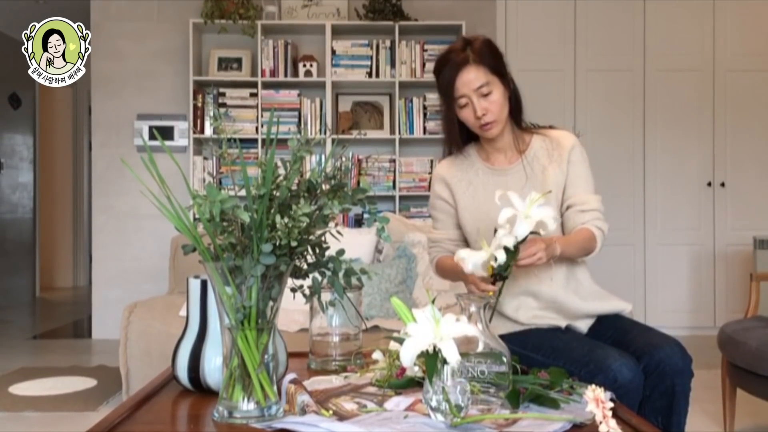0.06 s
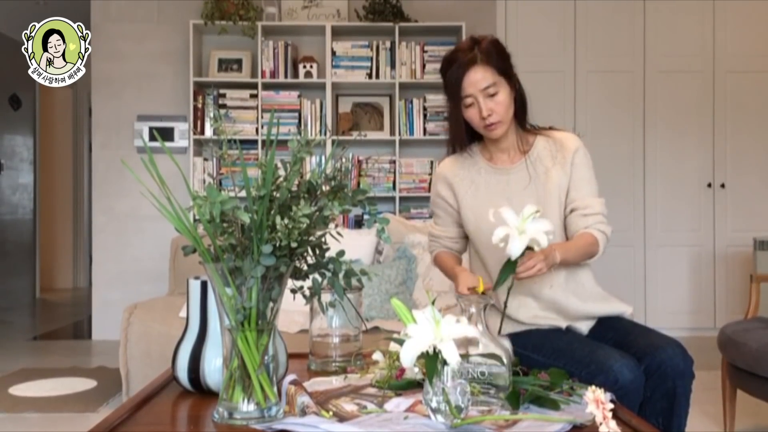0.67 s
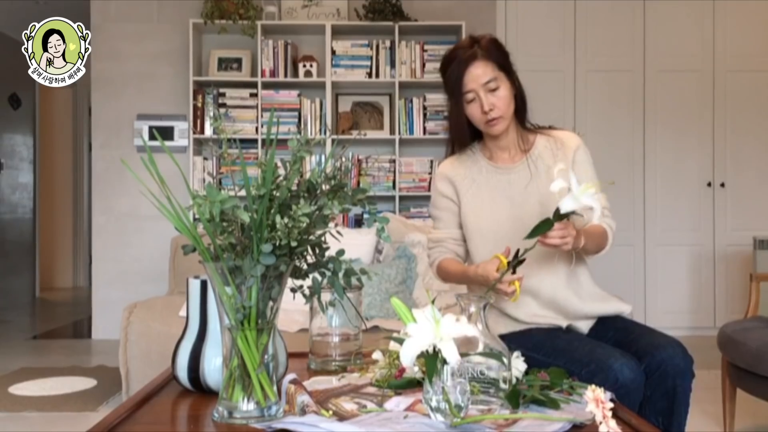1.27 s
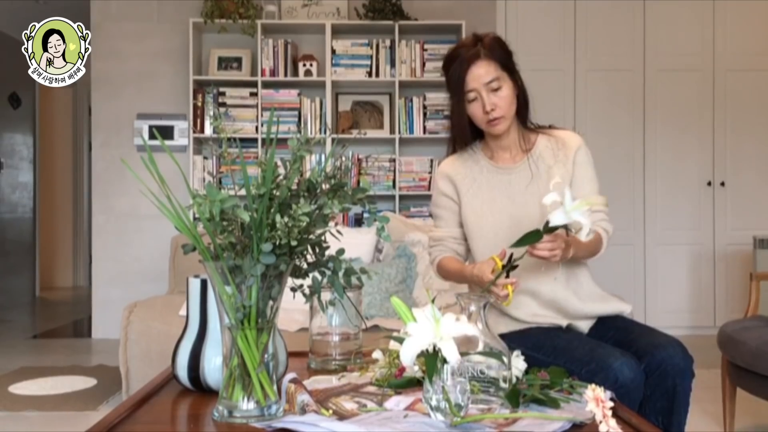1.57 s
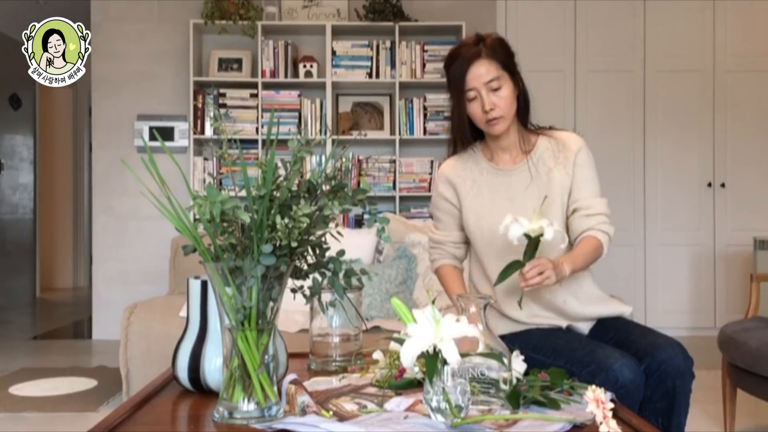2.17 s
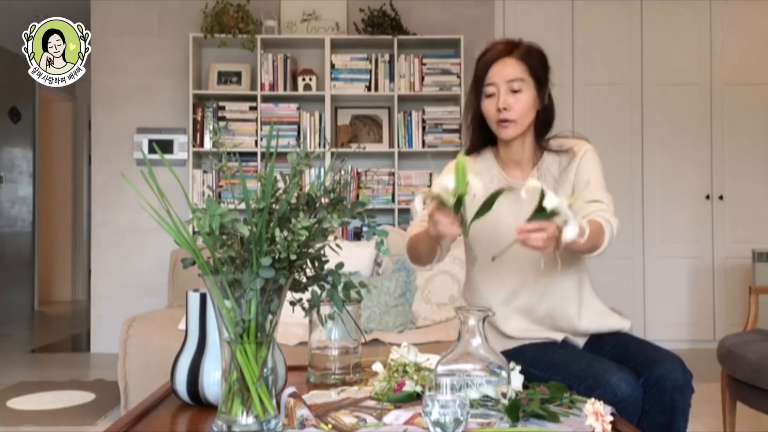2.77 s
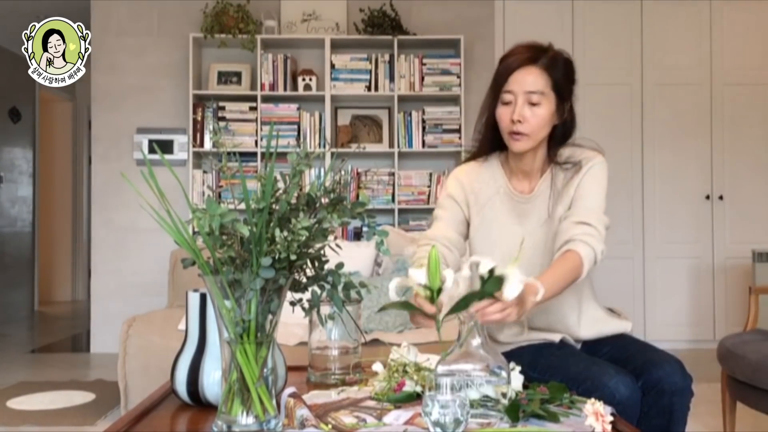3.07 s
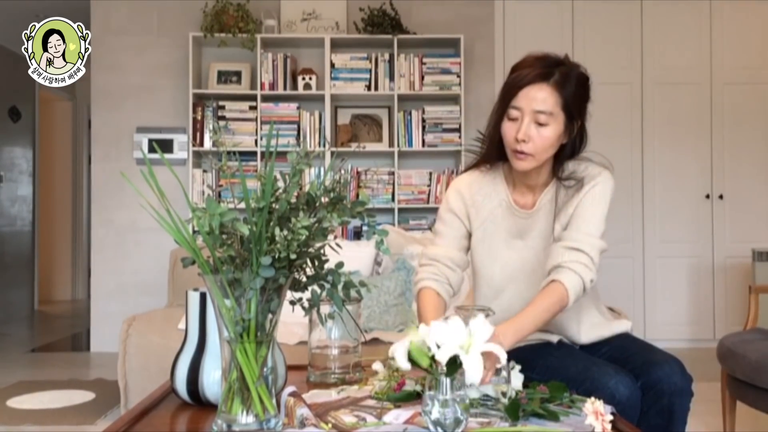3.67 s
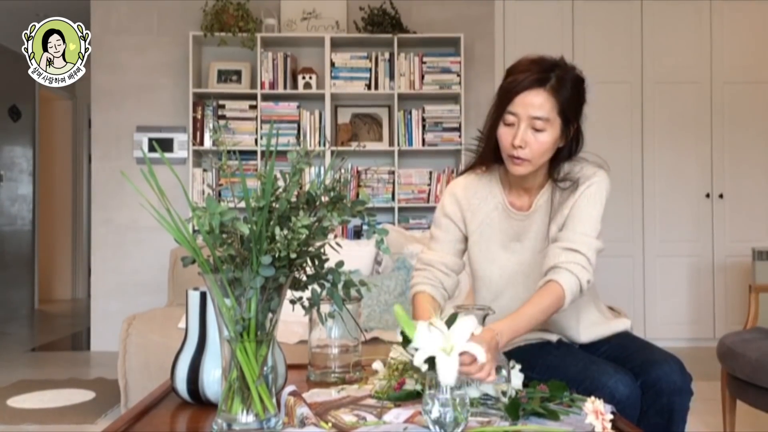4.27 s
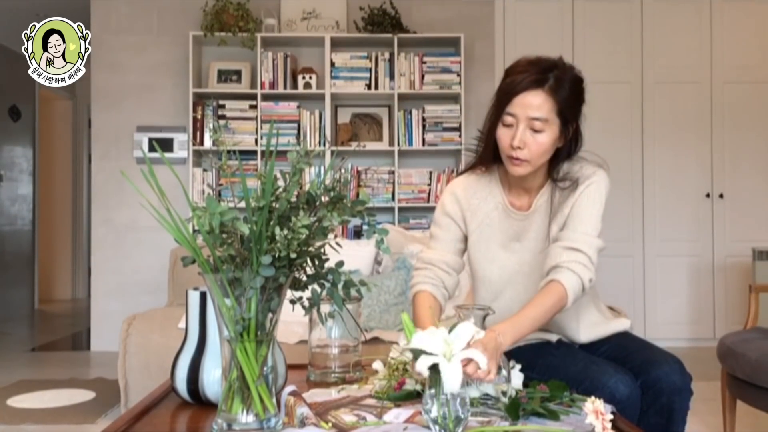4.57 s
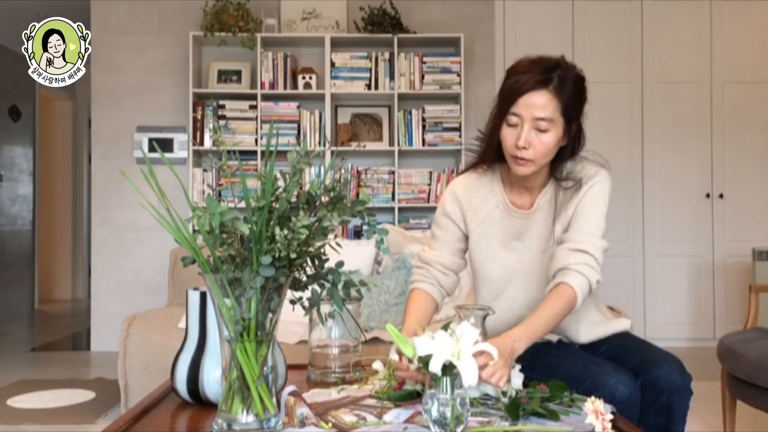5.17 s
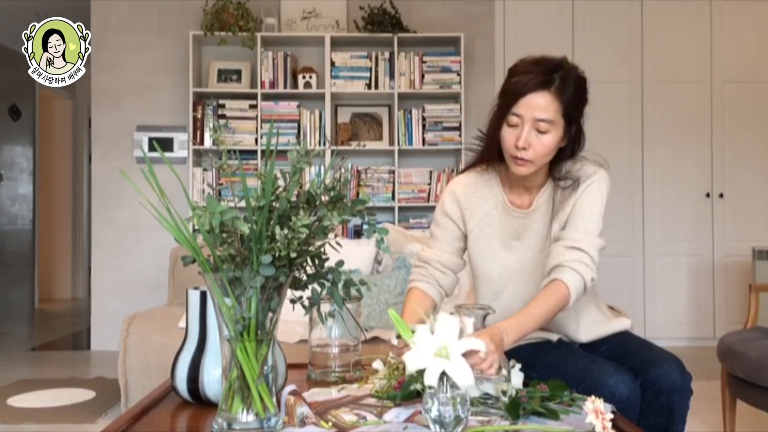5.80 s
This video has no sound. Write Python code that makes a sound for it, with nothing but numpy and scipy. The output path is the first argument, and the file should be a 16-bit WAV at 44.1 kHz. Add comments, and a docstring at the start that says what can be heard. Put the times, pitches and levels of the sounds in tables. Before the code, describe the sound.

In a quietly humming room, scissors snip twice and are set down, then stems rustle into a vase that knocks twice.

```python
"""Flower arranging in a quiet, slightly live living room, over a steady background hum.
Leaves flick and soft low thuds pass, like slow footsteps nearby. Scissors snap through a lily stem,
a small hollow pock follows and the offcut lands; they cut a second stem and are laid on the table.
Then leaves rustle, stems tick against a glass vase and slip on its neck, and the vase bumps twice
on the table top. One more thud sounds as the rustle fades."""
import sys
import numpy as np
from scipy import signal
from scipy.fft import rfft, irfft, next_fast_len
from scipy.io import wavfile
from scipy.ndimage import map_coordinates

SR = 44100
rng = np.random.default_rng(int(sys.argv[2]) if len(sys.argv) > 2 else 0)


def dump_mix(stems):
    """Bounce the given channels to the path in sys.argv[1] as a 16-bit WAV at rate SR."""
    frames = np.atleast_2d(stems).T  # one column per channel
    limited = np.clip(frames, -1, 1)  # hard clip at full scale
    pcm = np.round(limited * 32767).astype(np.int16)
    wavfile.write(sys.argv[1], SR, pcm)


N = 261981
T = np.arange(SR) / SR  # one second per event


def amp(db):
    """Decibels to gain."""
    return 10 ** (np.asarray(db) / 20)


def unit(x):
    """Scale to rms 1."""
    return x / np.sqrt(np.mean(x ** 2) + 1e-20)


def along(points, hz):
    """Read (Hz, value) points on a log frequency axis."""
    point_hz, values = np.transpose(points)
    return np.interp(np.log(hz + 1), np.log(point_hz), values)


def wobble(knots_per_s):
    """Smooth random curve."""
    knots = rng.standard_normal(int(N * knots_per_s / SR) + 4)
    return map_coordinates(knots, [np.arange(N) * knots_per_s / SR])


def noise(gain):
    """Steady noise of rms 1, shaped by gain(Hz)."""
    size = next_fast_len(N + SR // 4)
    spectrum = rfft(rng.standard_normal(size)) * gain(np.fft.rfftfreq(size, 1 / SR))
    return unit(irfft(spectrum, size)[:N])


def colour(x, shape_db, size=2048):
    """Minimum-phase filter of unit power, shaped by shape_db(Hz)."""
    gain = unit(amp(shape_db(np.fft.rfftfreq(size, 1 / SR))))
    cepstrum = irfft(np.log(gain + 1e-6))
    cepstrum[1:size // 2] *= 2
    cepstrum[size // 2 + 1:] = 0
    return signal.fftconvolve(x, irfft(np.exp(rfft(cepstrum))))[:len(x)]


def burst(length_s, passes=6):
    """Dense cluster of tiny cracks: quick rise, abrupt end, flat spectrum."""
    envelope = (1 - np.exp(-10 * T / length_s)) * np.exp(-(T / length_s) ** 4)
    cracks = rng.standard_normal(len(T))
    for _ in range(passes):
        phase = np.angle(rfft(cracks * envelope))
        cracks = irfft(np.exp(1j * phase))
    return cracks * (T < 2 * length_s) * np.linalg.norm(envelope)


def crackle(spectrum, length_s, tilt_db_per_oct):
    """A burst coloured by its material, tilted brighter or duller."""
    return colour(burst(length_s),
                  lambda hz: along(spectrum, hz) + tilt_db_per_oct * np.log2((hz + 500) / 5000))


def ring(modes, scatter_db=2):
    """Damped modes, struck at new strengths each time."""
    out = np.zeros(len(T))
    for hz, db, t60_s in modes:
        envelope = amp(db + scatter_db * rng.standard_normal() - 60 * T / t60_s)
        out += envelope * np.sin(2 * np.pi * (hz * T + rng.random()))
    return out


def in_room(x, wet_db):
    """Direct sound, wall echoes and a fresh diffuse tail whose treble dies first."""
    # Room decay. Each row: frequency in Hz, T60 in seconds.
    decay = [(60, 1), (250, 0.49), (1000, 0.6), (2800, 0.51), (4500, 0.48), (7500, 0.36), (11500, 0.3),
             (13500, 0.3), (16000, 0.24)]
    # Early echoes. Each row: delay in seconds, gain.
    walls = [(.0058, .26), (.0075, .14), (.0160, .28), (0.0199, .14)]
    hz, frame_s, frames = signal.stft(rng.standard_normal(len(T)), SR, nperseg=256)
    fade = amp(-60 * frame_s / along(decay, hz)[:, None])
    tail = signal.istft(frames * fade, SR, nperseg=256)[1][:len(T)]
    tail *= 1 - np.exp(-T / 0.00064)
    response = amp(wet_db) * tail / np.linalg.norm(tail)
    response[0] += 1
    for delay_s, gain in walls:
        response[round(delay_s * SR)] += gain
    return signal.fftconvolve(x, response)[:len(T)]


def add(track, start_s, x):
    """Mix x into the track."""
    start = max(round(start_s * SR), 0)
    track[start:start + len(x)] += x[:N - start]


def thuds(rows, wet_db):
    """Soft contacts: a few cycles swell and fade, then the room booms."""
    out = np.zeros(N)
    for peak_s, db, hz, half_length_s in rows:
        lead_s = np.pi * half_length_s
        envelope = np.exp(-((T - lead_s) / half_length_s) ** 2)
        push = envelope * np.cos(2 * np.pi * hz * (T - lead_s))
        add(out, peak_s - lead_s, amp(db) * in_room(push, wet_db))
    return out


def background(air_db=-41):
    """Steady air noise with narrow humming bands."""
    # Hum bands. Each row: centre in Hz, width in Hz, level in dB.
    bands = [(72.5, 17, -54), (114.5, 18, -50.5), (225.2, 14, -48), (265.7, 40.5, -47), (338.4, 34, -52),
             (556.2, 7.8, -58.5), (606.7, 18, -58.5)]
    # Air spectrum. Each row: frequency in Hz, relative density in dB.
    air = [(15, -49), (25, -19.5), (70, 0), (114, -3.5), (141, -7), (217, -6.5), (354, -10.5), (416, -15.5),
           (545, -14.5), (677, -18), (1370, -18.5), (1890, -29.5), (2160, -28), (2760, -34.5),
           (16000, -41.5)]
    hum = sum(amp(db) * noise(lambda hz: 1 / (1 + ((hz - centre_hz) / width_hz) ** 2) ** 2)
              for centre_hz, width_hz, db in bands)
    return hum + amp(air_db) * noise(lambda hz: amp(along(air, hz)))


def leaves(grain_db=2.5, ticks_per_s=50, tick_db=-10, tick_spread_db=6):
    """Grainy rustle and tiny ticks follow the handling; single leaves flick past."""
    # Leaf spectrum. Each row: frequency in Hz, relative level in dB.
    leaf = [(300, 3.5), (1200, 11.5), (2200, 9), (3200, 5), (4100, 6), (5000, 1), (7000, 2), (9000, -1),
            (10500, -10.5), (12000, -2.5), (15800, -21)]
    # Handling effort. Each row: time in seconds, rustle level in dB.
    effort = [(2.4, -56.5), (2.81, -56), (3.46, -57), (3.64, -50), (3.79, -56), (4.01, -52.5), (4.14, -50),
              (4.48, -51.5), (4.57, -46.5), (4.86, -59), (4.97, -52), (5.54, -53.5), (5.65, -56.5),
              (5.94, -57.5)]
    # Leaf flicks. Each row: start in seconds, level in dB, length in seconds, tilt in dB per octave.
    flicks = [(0.103, -47.5, 0.0039, 4), (0.392, -46, 0.013, -0.5), (0.679, -36, .024, -1.5),
              (2.595, -44, 0.041, -0.5), (3.453, -45, 0.025, 2.5), (3.962, -45.5, 0.032, 2),
              (4.038, -45, 0.06, 2.5), (4.24, -38.5, 0.0055, 1), (5.127, -45, 0.041, 5)]
    effort_db = np.interp(np.arange(N) / SR, *np.transpose(effort), left=-63)
    grains = amp(grain_db * wobble(knots_per_s=400))
    rustle = unit(grains * noise(lambda hz: amp(along(leaf, hz))))
    impulses = (rng.random(N) < ticks_per_s / SR) * amp(tick_spread_db * rng.standard_normal(N))
    ticks = unit(colour(impulses, lambda hz: along(leaf, hz)))
    out = amp(effort_db) * (rustle + amp(tick_db) * ticks)
    for start_s, db, length_s, tilt_db_per_oct in flicks:
        add(out, start_s, amp(db) * in_room(crackle(leaf, length_s, tilt_db_per_oct), wet_db=1))
    return out


def footsteps(heel_half_s=0.011, toe_half_s=0.0081, toe_delay_s=0.0603, toe_db=-6):
    """Through the floor: a heel fall, then a softer push from the ball of the foot."""
    # Heel falls. Each row: peak time in seconds, level in dB, frequency in Hz.
    steps = [(0.258, -21, 69), (0.843, -14.5, 73), (1.43, -14, 79.5), (1.968, -17.5, 55.5),
             (2.541, -28.5, 62), (5.699, -26.5, 84)]
    heels = [(peak_s, db, hz, heel_half_s) for peak_s, db, hz in steps]
    toes = [(peak_s + toe_delay_s, db + toe_db, hz, toe_half_s) for peak_s, db, hz in steps]
    return thuds(heels + toes, wet_db=-8)


def scissors(ripple_db=2.5, ripple_points=200):
    """The blades bite, the stem gives, the blades slam shut and spring open; the steel rings."""
    # Cuts. Each row: snap time in seconds, snap level in dB, snap length in seconds,
    # relative steel ring in dB, bite level in dB, bite length in seconds.
    cuts = [(0.5268, -3, 0.00235, 2, -29, 0.0015), (1.9221, -5.1, 0.0018, -5, -36, 0.013)]
    # Cracking stem spectrum. Each row: frequency in Hz, relative level in dB.
    stem = [(150, -22), (550, -5.5), (1100, -7), (1650, -8), (2350, 2), (2750, 2.5), (3300, -4),
            (4100, 0.5), (4900, -9.5), (5700, 1.5), (9500, 0), (11700, 4), (13000, -6), (15800, -5)]
    # Blade modes. Each row: frequency in Hz, relative level in dB, T60 in seconds.
    steel = [(2250, -38, .12), (2477, -25, 0.15), (2670, -29, 0.09), (3770, -38, 0.75), (7300, -46, 0.084),
             (11500, -34, .1), (11374, -34, 0.094)]
    # Crowded, damped resonances of blades and handles colour every cut alike.
    body_hz = np.linspace(0, SR / 2, ripple_points)
    body_db = ripple_db * rng.standard_normal(ripple_points)
    out = np.zeros(N)
    for snap_s, snap_db, snap_length_s, steel_db, bite_db, bite_length_s in cuts:
        stages = [(snap_s - 0.015, bite_db, bite_length_s, -2),  # bite
                  (snap_s - 0.0045, snap_db - 18, 0.0029, -4.5),  # give
                  (snap_s, snap_db, snap_length_s, 0),  # snap
                  (snap_s + 0.2497, -37, 0.0069, -5.5)]  # reopen
        for start_s, db, length_s, tilt_db_per_oct in stages:
            crack = crackle(stem, length_s, tilt_db_per_oct)
            crack = colour(crack, lambda hz: np.interp(hz, body_hz, body_db))
            add(out, start_s, amp(db) * in_room(crack + amp(steel_db) * ring(steel), wet_db=1))
    return out


def pock():
    """A small hollow pock after the first cut."""
    # Each row: peak time in seconds, level in dB, frequency in Hz, half length in seconds.
    pocks = [(0.6172, -23.5, 730, 0.0019)]
    return thuds(pocks, wet_db=-6.5)


def taps(contact_s=0.0055, table_attack_s=0.0015):
    """Offcuts, scissors and stems land on table and vase; heavy contacts shake the table top."""
    # Landings. Each row: start in seconds, level in dB, low-pass corner in Hz, relative table ring in dB.
    hits = [(0.8635, -31.5, 2880, -28), (0.876, -35.5, 2500, -28), (2.2654, -23.5, 5100, -2),
            (2.2708, -20.5, 3500, 8), (2.2847, -29, 1680, 18.5), (2.3157, -28.5, 4300, 9),
            (3.616, -37, 3200, -4), (4.4711, -32, 3230, -20), (4.585, -38, 6100, -24)]
    # Contact spectrum. Each row: frequency in Hz, relative level in dB.
    spectrum = [(100, -11), (500, 6), (950, 5), (1500, 2), (2300, 5), (3400, 0.5), (4600, 1), (5700, 4.5),
                (15000, 0.5)]
    # Modes of hard contacts and table top. Each row: frequency in Hz, relative level in dB, T60 in seconds.
    clack = [(893, -16.5, 0.033), (2820, -21, .03), (4490, -10.5, 0.026)]
    table_top = [(127, -14, 0.11), (171, -10.5, 0.06), (275, -16, 0.041), (312, -15, 0.16), (433, -22, 0.1),
                 (854, -16.5, 0.04), (1020, -14, 0.028)]
    out = np.zeros(N)
    for start_s, db, corner_hz, table_db in hits:
        contact = burst(contact_s) + ring(clack)
        click = colour(contact, lambda hz: along(spectrum, hz) - 10 * np.log10(1 + (hz / corner_hz) ** 4))
        body = amp(table_db) * ring(table_top) * (1 - np.exp(-T / table_attack_s))
        add(out, start_s, amp(db) * in_room(click + body, wet_db=-2.5))
    return out


def glass_pings(attack_s=0.00084):
    """Stem tips set the vase ringing faintly."""
    # Touches. Each row: start in seconds, level in dB.
    pings = [(3.587, -46.5), (3.724, -47), (3.816, -51)]
    # Glass modes. Each row: frequency in Hz, relative level in dB, T60 in seconds.
    glass = [(2470, 2, .06), (4030, -2.5, 0.17), (5820, -2, 0.065), (6500, -5, .05), (9000, -1, 0.065),
             (11400, -8, .04)]
    out = np.zeros(N)
    for start_s, db in pings:
        ping = ring(glass, scatter_db=0.5) * (1 - np.exp(-T / attack_s))
        add(out, start_s, amp(db) * in_room(ping, wet_db=-1))
    return out


def vase_bumps(rock_s=0.030, rock_loss_db=7.5, edge_db_per_oct=9, edge_pivot_hz=255.5):
    """The vase drags, tips, lands flat and rocks to rest; edge contacts favour the higher modes."""
    # Bumps. Each row: landing time in seconds, level in dB, relative tipping level in dB.
    bumps = [(3.743, -18.5, -18), (4.514, -14.5, -8.5)]
    # Modes of vase on table. Each row: frequency in Hz, relative level in dB, half length in seconds.
    modes = [(163.5, -9, 0.011), (255.5, -1.5, 0.0083), (346, -8, 0.0078)]
    drag_lead_s, drag_db, drag_half_s = 0.058, -15, 0.019
    contacts = []
    for land_s, db, tip_db in bumps:
        tipping = [(land_s - rock_s, db + tip_db)]
        rocking = [(land_s + k * rock_s, db - k * rock_loss_db) for k in (1, 2)]
        for hz, mode_db, half_s in modes:
            edge_db = mode_db + edge_db_per_oct * np.log2(hz / edge_pivot_hz)
            contacts.append((land_s - drag_lead_s, db + drag_db + edge_db, hz, drag_half_s))
            contacts.append((land_s, db + mode_db, hz, half_s))
            contacts += [(at_s, hit_db + edge_db, hz, half_s) for at_s, hit_db in tipping + rocking]
    return thuds(contacts, wet_db=-6)


def stem_slips():
    """Wet stems scrape down the neck of the vase."""
    # Slips. Each row: start in seconds, level in dB, length in seconds.
    slips = [(4.385, -46.5, 0.023), (4.475, -34.5, 0.0043), (4.62, -37.5, 0.0046), (4.80, -47.5, .03),
             (4.91, -47, 0.0096)]
    # Neck spectrum. Each row: frequency in Hz, relative level in dB.
    neck = [(500, -18), (1700, -19), (2150, 1), (2700, -16), (4000, -20), (9000, -24.5), (15000, -31)]
    out = np.zeros(N)
    for start_s, db, length_s in slips:
        scrape = colour(burst(length_s), lambda hz: along(neck, hz))
        add(out, start_s, amp(db) * in_room(scrape, wet_db=-3))
    return out


def scene():
    """All sources summed at one microphone."""
    knocks = footsteps() + vase_bumps() + pock()
    handling = scissors() + taps() + glass_pings() + stem_slips() + leaves()
    return (knocks + handling + background())[None]


def record(dry, top_hz=16000):
    """Clip at full scale, then low-pass steeply."""
    size = next_fast_len(N + SR // 4)
    passband = 1 / (1 + (np.fft.rfftfreq(size, 1 / SR) / top_hz) ** 200)
    return irfft(rfft(np.clip(dry, -1, 1), size) * passband, size)[:, :N]


dry = scene()
out = record(dry)
dump_mix(out)
```